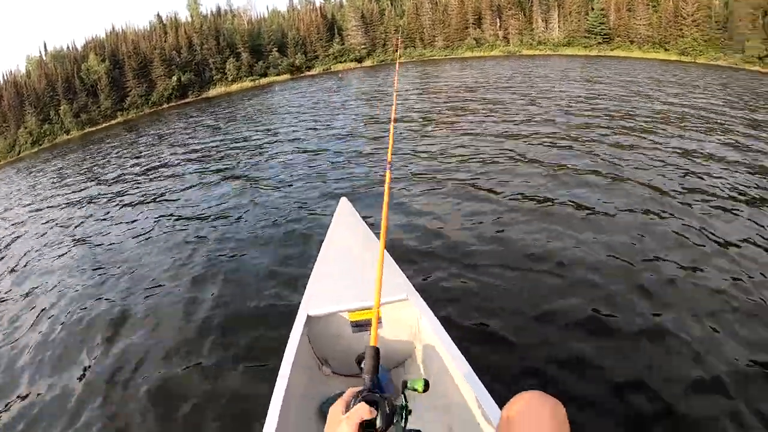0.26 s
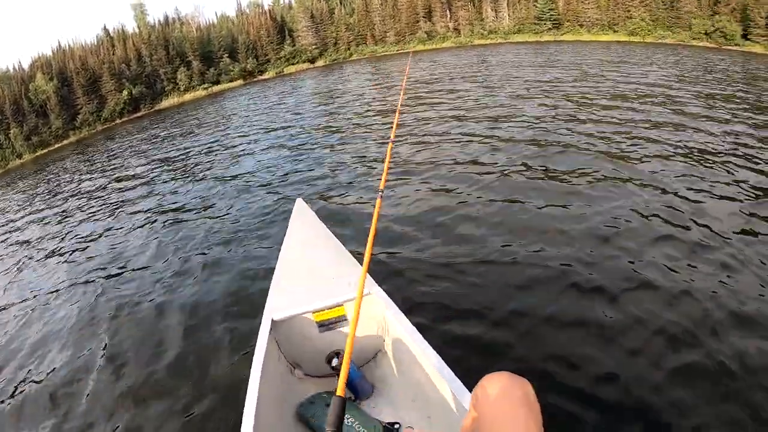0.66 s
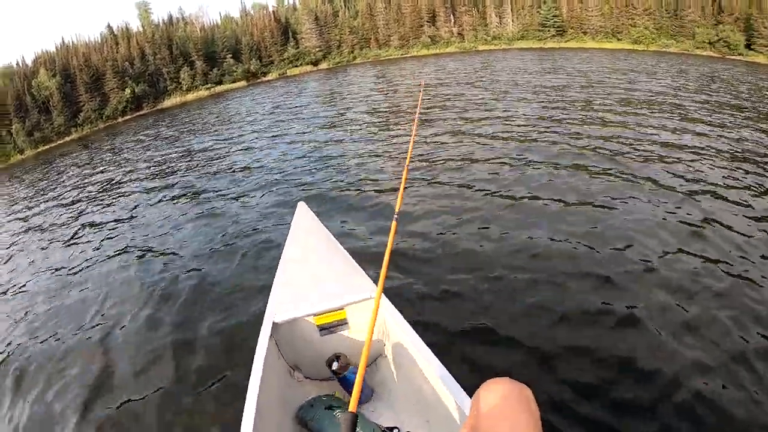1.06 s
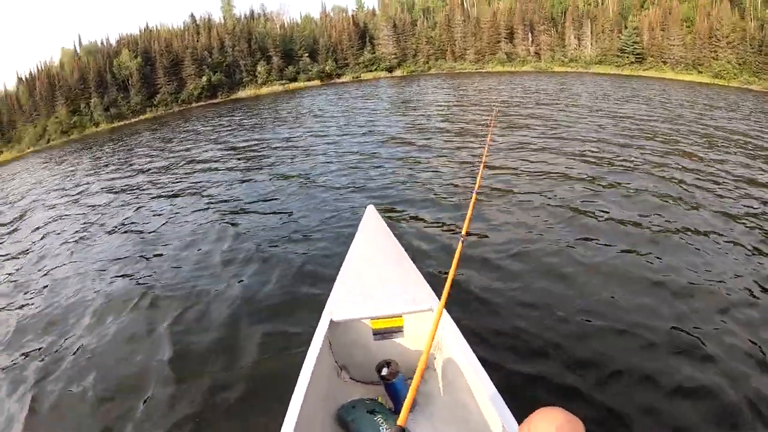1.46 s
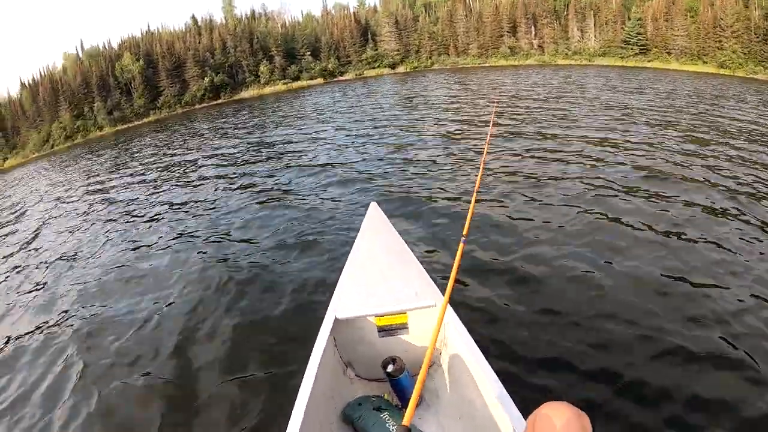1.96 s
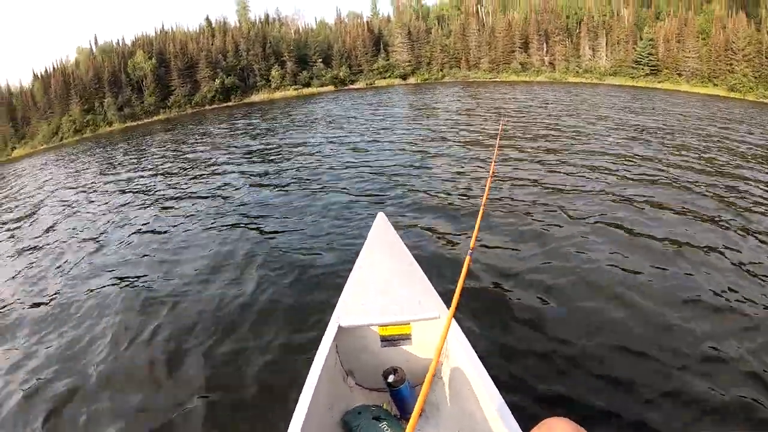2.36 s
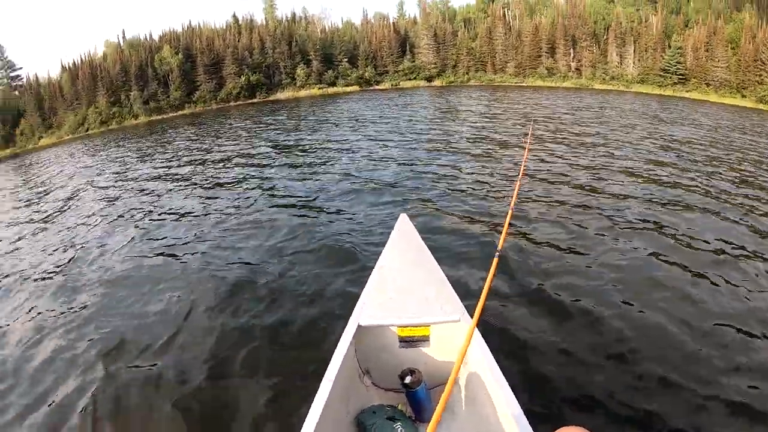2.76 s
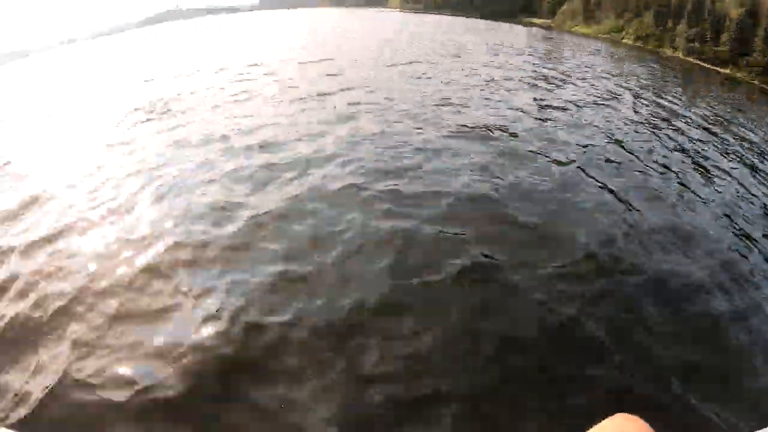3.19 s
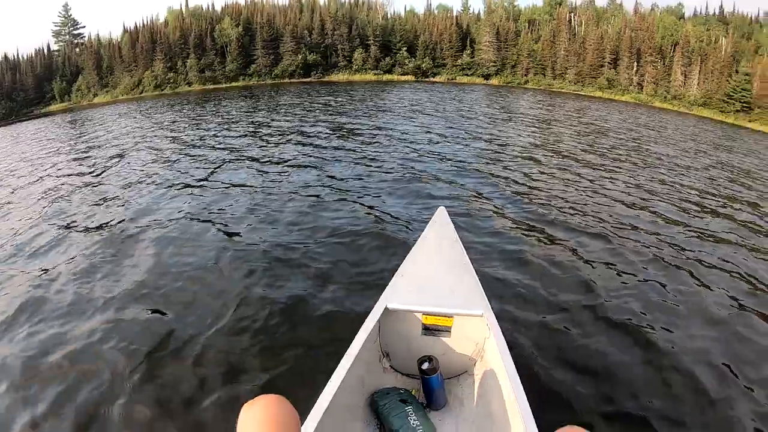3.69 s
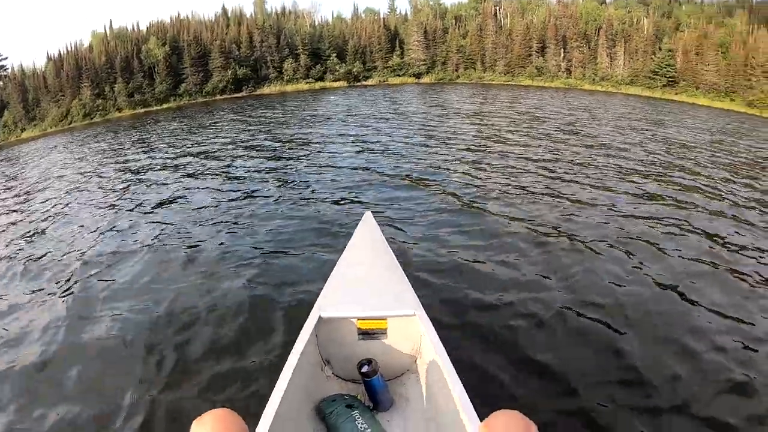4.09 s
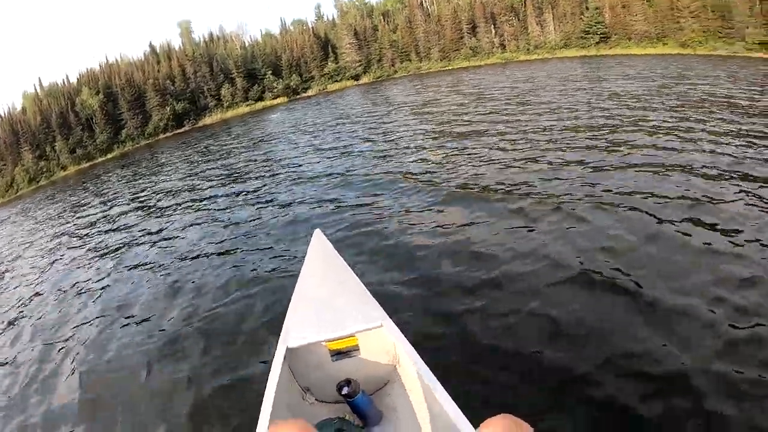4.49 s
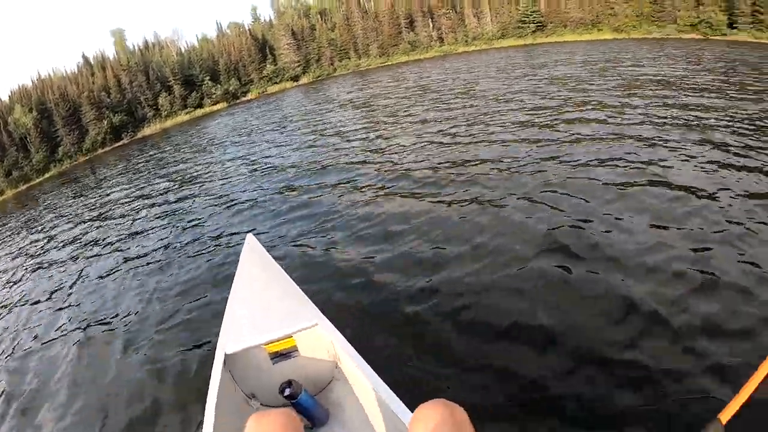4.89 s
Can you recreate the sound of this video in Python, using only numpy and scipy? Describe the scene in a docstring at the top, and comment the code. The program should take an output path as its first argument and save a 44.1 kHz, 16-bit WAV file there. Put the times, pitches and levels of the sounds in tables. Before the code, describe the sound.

Low wind rumbles and thumps on a head-worn microphone throughout, while small waves fizz softly along a canoe, with tiny bubbles popping in the first half. At about 0.8 seconds a fishing reel's latch snaps sharply, the loudest click. A faint bird whistles two falling notes at 1.5 seconds, followed by a small tick. From 2.6 to 3.1 seconds come light clicks and knocks, a soft falling gurgle and rubbing clothes. The wind swells strongly just after 3 seconds, and a hollow knock sounds on the hull at 3.5. From about 4 seconds the reel is wound on the right, a soft whirring hiss with short bursts of gear ticking near 4.4, 4.7 and 4.9 seconds, over rustling cloth and more gusts. The bird repeats faintly at 4.8 seconds, and two light knocks come at 5.1.

```python
"""Fishing from a canoe

Wind thumps on a small stereo microphone on an angler's head. Little waves fizz and bubble along
the hull. The reel latch snaps, clothes rub as the angler twists, and the crank is wound:
the spool whirrs and the gear teeth tick. A bird whistles two falling notes from the shore, twice."""
import sys
import numpy as np
from scipy import signal
from scipy.fft import rfft, irfft
from scipy.io import wavfile
from scipy.ndimage import uniform_filter1d

SR = 44100
rng = np.random.default_rng(int(sys.argv[2]) if len(sys.argv) > 2 else 0)


def wav_record(signal):
    """Record a signal, one row per channel, as 16-bit PCM in the file named by sys.argv[1]."""
    frames = np.transpose(np.atleast_2d(signal))
    bounded = np.clip(frames, -1, 1)
    # unit amplitude maps onto the largest positive 16-bit level
    quanta = np.round(bounded * 32767).astype(np.int16)
    wavfile.write(sys.argv[1], SR, quanta)


N = 226798

# Gusts; pan is always left minus right: peak t/s, level/dB, rise/s, fall/s, pan/dB, small eddies/dB
GUSTS = [(0.0, -28.5, .1, 0.15, -2, 2), (.35, -37.5, 0.19, 0.11, -9.5, 1.5),
         (.62, -36.5, 0.25, 0.11, 16, 2), (.95, -34, 0.063, 0.042, 13.5, -1.5),
         (1.36, -34, 0.032, 0.029, 23, 1), (1.65, -47, 0.42, 0.21, 9, -23),
         (1.97, -39, 0.087, 0.046, 20, -3.5), (2.35, -30.5, 0.1, 0.14, 2.5, -2.5),
         (2.8, -47, 0.63, 0.1, 12, -19), (3.14, -25, 0.041, 0.11, 5, 3),
         (3.299, -24.5, 0.11, 0.034, -5.5, 1), (3.78, -38, 0.19, 0.2, -18, 1),
         (3.991, -29, 0.056, 0.055, -8.5, 6), (4.35, -35.5, 0.051, 0.049, -18, 2.5),
         (4.549, -26, 0.046, 0.091, -10.5, -3.5), (4.97, -29, 0.24, 0.2, 3, -5)]
# Tone of the wind: f/Hz, relative level/dB
WIND_COLOUR = [(15, -7), (36, 11), (53, 0), (113, -15), (231, -44.5), (261, -66), (420, -48), (550, -59),
               (920, -120)]
# Higher rumble of the gusts: t/s, level/dB
RUMBLE = [(0, -62), (1.0, -67), (2.95, -67), (3.13, -48), (3.3, -54.5), (4.04, -60), (4.1, -45), (4.6, -54),
          (5.14, -52)]

# Loudness of the little waves: t/s, level/dB
LAPPING = [(0, -59.5), (.3, -60), (.73, -63), (1.3, -61.5), (1.94, -60), (2.55, -58.5), (3.6, -64),
           (4.05, -66.5), (5.14, -58)]
# Tone of the water: f/Hz, relative level/dB
WATER_COLOUR = [(180, -41), (300, -32), (331, -7.5), (622, -6.5), (711, 3.5), (1040, -7), (1150, -1.5),
                (1950, -2.5), (3270, -3.5), (3860, -6.5), (6560, -14), (9290, -13), (11500, -36.5),
                (15800, -44)]
# How alike the water sounds on both sides: f/Hz, likeness from 0 to 1
WATER_LIKENESS = [(300, 0.26), (1000, 0.25), (3000, 0.84), (8000, 0.66), (14000, 0.2)]
# How far the water's sound on the left runs ahead: f/Hz, phase/rad
WATER_LEFT_LEAD = [(0, 16), (860, -2.5), (2330, 1.2), (4740, 1.07), (7150, 3), (11500, 2), (16000, -7)]
# Brief dips in the water and cloth sounds: t/s, gain/dB, half width/s
DIPS = [(.1, -5.5, 0.056), (3.67, -6.5, 0.064), (4.0, -11.5, 0.078)]
# Nearby bubbles and drips: t/s, level/dB, f/Hz
BUBBLES = [(0.0698, -38.5, 2860), (0.178, -39.5, 2630), (0.2163, -45, 2280), (0.2678, -39.5, 2870),
           (0.342, -41, 1920), (0.531, -40, 1780), (0.576, -44.5, 3300), (0.6156, -44.5, 2660),
           (0.671, -42, 3200), (0.6905, -41, 2500), (0.822, -42, 1890), (1.226, -41, 2070),
           (1.2732, -43.5, 1880), (1.609, -41, 3190), (1.8313, -42, 3700), (1.848, -38.5, 1760),
           (1.961, -39.5, 2510), (2.2576, -42, 3220), (2.43, -42, 4520)]
# Water in a closing hollow: t/s, f/Hz, level/dB
GURGLE = [(2.755, 950, -58), (2.789, 704, -52), (2.83, 540, -47), (2.97, 375, -49.5), (3.1, 290, -57)]
# Droplets hitting the hull: t/s, relative level/dB
SPRAY = [(0.7172, -45), (1.832, -46.5), (2.1824, -53), (2.3475, -49), (2.358, -50), (2.375, -44.5),
         (2.5656, -46), (3.4084, -38)]
# Tone of the droplets: f/Hz, gain/dB
SPRAY_COLOUR = [(2500, -24), (4500, 16), (6500, -14), (9200, 11), (11500, -9.5), (14500, -21)]

# Short hollow knocks: against the hull, and the low thud of the reel latch:
# t/s, level/dB, f/Hz, pan/dB, time to fade 60 dB/s
KNOCKS = [(0.065, -40, 252, 0, 0.038), (.771, -29, 532, 1, .012), (1.6818, -34, 2470, 10.5, 0.011),
          (2.681, -39.5, 960, 26, 0.0056), (2.694, -40, 1270, 22, 0.023), (2.772, -35, 940, 24, 0.0071),
          (2.794, -36, 756, 26, 0.0065), (2.813, -35.5, 512, 3, 0.039), (2.876, -38, 1020, 19, 0.013),
          (2.945, -38, 890, 26, 0.019), (2.999, -35.5, 347, -4, 0.045), (2.7061, -28.5, 250, -2, 0.0047),
          (3.524, -16, 560, -4.5, 0.0087), (3.53, -30, 189, 0.5, 0.057), (5.095, -30.5, 580, -7, 0.011),
          (5.123, -32, 565, -5, 0.0095)]
# Snaps of reel parts: t/s, level/dB, brightness/(dB per octave), pan/dB, chatter length/s
SNAPS = [(0.394, -39, -2, 4, 0.0012), (0.45, -40.5, -15, -8, 0.002), (0.457, -37, 6, -4, 0.0023),
         (0.7453, -26, 6, -4, 0.0025), (.769, -20, -16.5, -12.5, 0.0017), (0.7725, -5.5, 14, -3, 0.0019),
         (0.7842, -19, -11, -13, 0.0014), (0.787, -35.5, -14, -8, 0.012), (1.68, -36.5, -4, 6, 0.0069),
         (2.581, -32.5, 6, 5, 0.0027), (2.596, -37, 18, -4, 0.0036), (2.638, -36, 2, 5, 0.0092),
         (2.7062, -21, -7, 2, 0.00094), (2.751, -30.5, -2, 0, 0.0081), (3.39, -29.5, -12, -9, 0.0014),
         (4.354, -30, -3, 4, 0.0032)]
# Ringing tones of the reel body: f/Hz, relative level/dB, time to fade 60 dB/s
REEL_MODES = [(760, -20, 0.0083), (1460, 5, 0.0064), (1880, 9.5, 0.011), (2830, -7, 0.013),
              (3460, 23.5, 0.0026), (4600, 1, 0.0024), (5170, 9, 0.0042), (6450, 1, 0.0076),
              (6920, -5, 0.0055), (8350, -13.5, 0.011), (10500, -40, 0.0033)]
# Resonances of the gear housing: f/Hz, width/Hz, gain/dB
HOUSING_MODES = [(1542, 520, -5.5), (2246, 660, -9), (3960, 2470, -27.5), (8600, 1250, -21)]
# Pushes on the crank, each speeding up and slowing down:
# t/s, length/s, fastest after/s, top tooth rate/Hz, bend of that rate/(Hz per s squared), level/dB
CRANK_PUSHES = [(3.72, .06, .028, 410, 32000, -50), (4.385, .1, .022, 420, 29000, -37.5),
                (4.655, .07, .029, 426, 55000, -37), (4.89, .085, .04, 410, 80000, -38)]

# Rubs of cloth and gear: peak t/s, rise/s, fall/s, dull level/dB, middle over dull/dB, bright over dull/dB
RUBS = [(2.598, 0.014, 0.017, -73, 38, 35.5), (2.701, 0.032, 0.035, -48, 11.5, -4.5),
        (2.773, 0.048, 0.073, -44.5, 5, -3.5), (2.886, 0.02, 0.013, -45, 12, -5),
        (2.934, 0.046, 0.12, -42, 7, -9.5), (3.12, 0.14, 0.32, -60, -6, 3.5),
        (3.4, 0.031, 0.21, -57.5, 13.5, -4), (3.514, 0.1, 0.036, -43.5, 1, -11.5),
        (3.535, 0.023, 0.024, -36, -14.5, -17.5), (3.63, 0.075, 0.04, -54.5, -6, -4),
        (3.738, 0.051, 0.069, -65.5, 11.5, 5), (3.845, 0.13, 0.055, -54.5, -8, -16),
        (4.101, 0.23, 0.58, -63, -8, 5.5), (4.3, 0.095, 0.46, -43, 0.5, -12),
        (4.45, 0.24, 0.36, -47, -7, -26), (4.7, 0.37, 0.051, -56, 14, -13.5),
        (5.1, 0.42, 0.19, -49.5, -6, -16)]
# Tone of the cloth: f/Hz, relative level/dB
CLOTH_COLOUR = [(120, -17), (200, -21), (316, 1), (588, 4), (788, 0.5), (912, 0.5), (1490, -11),
                (2320, -16), (6570, -34), (9820, -34), (11500, -58), (15000, -57), (15800, -70)]
# Side of the rustle as the head swings: t/s, strongest pan/dB
RUSTLE_PAN = [(2.5, -1), (2.7, 3), (3.15, 5.5), (3.35, -11.5), (3.75, -22), (4.3, -6.5), (5.14, -17)]
# A tightening line or strap: t/s, f/Hz, relative level/dB
SQUEAK = [(4.24, 600, -58), (4.255, 640, -50), (4.27, 820, -54), (4.335, 900, -50), (4.35, 920, -60)]

# The bird's two notes, a list of points for each: t/s into the call, f/Hz, level/dB
BIRD_NOTES = [
    [(0, 4800, -65), (.027, 4375, -59.5), (.07, 4265, -56), (.087, 4000, -66)],
    [(.092, 3350, -48), (.112, 3120, -44.5), (.137, 2950, -56)],
]
# When the bird calls: t/s, gain/dB
BIRD_CALLS = [(1.52, -0.5), (4.779, -2)]
# Peeps of a farther bird: t/s, length/s, f/Hz, level/dB
FAR_PEEPS = [(4.635, .03, 3900, -62), (4.713, 0.015, 3930, -59)]


def wind():
    """Eddies, small swirls of air, push on each side of the microphone; gusts add a higher rumble."""
    eddies = rng.standard_normal((2, N)) * evened(amp(lumps((2, N), (1, 800), depth_db=5)))
    hz, t, spectrum = to_spectrum(eddies, 2048)
    colour_db = read(WIND_COLOUR, hz)
    low_db = colour_db - band_db(colour_db, hz, 20, 120) + 3
    patches_db = lumps(spectrum.shape, (1, 2, 6), depth_db=3) - 2  # each eddy has its own pitch
    sides_db, small_db = gusts_db(t)
    shed_db = 0.52 * (sides_db.mean(0) + 41.5) + small_db  # strong gusts shed smaller eddies
    lift_db = np.outer(read([(45, 0), (100, 0.99)], hz), shed_db)
    buffets = to_sound(spectrum * amp(low_db[:, None] + patches_db + lift_db), 2048)
    rumble_band = np.exp(-(np.log((hz + 1) / 170) / 0.58) ** 2)  # a hump around 170 Hz
    blended = amp(-3) * (spectrum + 0.44 * spectrum[::-1])  # much alike on both sides
    rumble = evened(to_sound(blended * rumble_band[:, None], 2048))
    s = np.arange(N) / SR
    return buffets * amp([np.interp(s, t, db) for db in sides_db]) + rumble * amp(along(RUMBLE, s)[0])


def gusts_db(t):
    """Gusts swell over a steady breeze: the level on each side, and the gain of the small eddies."""
    breeze = (0, -48.5, np.inf, np.inf, 8.5, -36)  # a gust that never fades
    s, db, rise, fall, pan_db, small_db = np.array(GUSTS + [breeze]).T
    each_db = db[:, None] + swells(np.transpose([s, rise, fall]), t)
    sides_db = np.array([summed_db(each_db + side * pan_db[:, None]) for side in (.5, -.5)])
    return sides_db, summed_db(each_db + small_db[:, None]) - summed_db(each_db)


def snaps():
    """Parts chatter for a moment and make the reel body ring."""
    out, t = np.zeros((2, N)), np.arange(2500) / SR
    band = signal.butter(2, [700, 8300], "band", fs=SR)  # small parts give no bass; the hand dulls them
    for s, peak_db, tilt_db, pan_db, length in SNAPS:
        age = t / length
        chatter = rng.standard_normal(len(t)) * (age * np.exp(-age ** 2) + amp(-17.5) * np.exp(-t / .0085))
        grip = rng.uniform(.97, 1.03)  # the hand shifts the pitch a little
        ring = sum(amp(db + tilt_db * np.log2(hz / 3000) - 60 * t / fade_s)
                   * np.sin(2 * np.pi * hz * grip * t) for hz, db, fade_s in REEL_MODES)
        snap = signal.lfilter(*band, signal.oaconvolve(chatter, ring)[:len(t)])
        add(out, s, amp(peak_db) * placed(snap / abs(snap).max(), pan_db, lag=-1.2))
    return out


def reel():
    """The reel is wound on the right, so the left side hears it softer and later."""
    return placed(spool_whirr() + gear_teeth(), pan_db=-16.5, lag=17.6)


def spool_whirr(start_s=4.055, spin_up_s=0.087, line_eases_s=4.74):
    """Spool and line hiss in the housing, sagging just after each push on the crank."""
    t = np.arange(N) / SR
    treble_db = -9.5 * (1 + np.tanh((t - line_eases_s) / .03)) / 2  # duller as the line slackens
    friction = rng.standard_normal(N) * amp(lumps((N,), (60,), depth_db=1.5))
    hiss = evened(housing(friction, treble_db))
    sag_db = dips_db([(s + length + .018, -10, .04) for s, length, *_ in CRANK_PUSHES], t)
    level_db = -46 - 19.5 * np.exp(-abs(t - start_s) / spin_up_s) + sag_db
    return hiss * amp(level_db) * (t > start_s)


def gear_teeth():
    """Teeth tick evenly when pushed hard and rattle loosely when pushed lightly."""
    out = np.zeros((1, N))
    for s, length, fastest_s, top_hz, bend, top_db in CRANK_PUSHES:
        t = np.arange(0, length, 1 / SR)
        hz = top_hz - bend * (t - fastest_s) ** 2
        level_db = top_db - 9.5 * (2 * t / length - 1) ** 2
        loose = np.clip((-35.5 - level_db) / 20, 0, 1)
        wobble = amp(lumps(t.shape, (100,), depth_db=.05))
        phase = 2 * np.pi * np.cumsum(uniform_filter1d(hz, 300) * wobble) / SR
        ticks = sum(np.cos(k * phase) / k for k in range(1, 7))
        scrape = rng.standard_normal(len(t)) * (1 + np.cos(phase))
        teeth = (1 - loose) * evened(housing(ticks)) + loose * evened(housing(scrape))
        add(out, s, teeth[None] * amp(level_db) * signal.windows.tukey(len(t), .2))
    return out[0]


def housing(x, treble_db=0):
    """The reel's hollow case rings at a few pitches; treble_db turns the highest up or down."""
    rings = [(-1) ** k * amp(db) * resonate(x, hz, width) for k, (hz, width, db) in enumerate(HOUSING_MODES)]
    return sum(rings[:-1]) + amp(treble_db) * rings[-1]


def rustle(head_turn_s=3.3):
    """Rubbing cloth makes grainy noise whose dull, middle and bright parts swell separately."""
    grain = amp(lumps((N,), (250,), depth_db=2))
    near, other = rng.standard_normal((2, N)) * evened(grain)
    turned = np.arange(N) / SR > head_turn_s
    left = np.where(turned, np.roll(near, 12), np.roll(near, -3))  # early at first, late after the turn
    hz, t, spectrum = to_spectrum(np.array([left, 0.62 * (near + other)]), 256)
    dull_db, middle_db, bright_db = rubs_db(t)
    colour_db = read(CLOTH_COLOUR, hz)
    # level/dB, lowest f/Hz, highest f/Hz, points of (f/Hz, share)
    parts = [(dull_db, 300, 1100, [(800, 1), (1800, 0)]),
             (middle_db, 1100, 4000, [(800, 0), (1800, 1), (2800, 1), (6000, 0)]),
             (bright_db, 4000, 12000, [(2800, 0), (6000, 1)])]
    level_db = sum(np.outer(read(share, hz), db - band_db(colour_db, hz, lo, hi))
                   for db, lo, hi, share in parts)
    level_db += colour_db[:, None] + lumps(spectrum[0].shape, (3, 8), depth_db=2.5)
    shadow = read([(350, 0), (900, 0.9), (2500, 0.98), (5000, 0.56)], hz)  # the head blocks no bass
    pan_db = np.outer(shadow, along(RUSTLE_PAN, t)[0])
    return to_sound(spectrum * amp(level_db) * amp([pan_db / 2, -pan_db / 2]), 256)


def rubs_db(t):
    """Levels of the dull, middle and bright parts of all rubs together."""
    rows = np.array(RUBS)
    each_db = rows[:, 3:4] + swells(rows[:, :3], t)
    return [summed_db(each_db + over_db) + dips_db(DIPS, t) for over_db in (0, rows[:, 4:5], rows[:, 5:6])]


def knocks():
    """Knocks on the hull and the thud of the reel latch: a few swings that quickly stop."""
    out, t = np.zeros((2, N)), np.arange(3000) / SR
    for s, peak_db, hz, pan_db, fade_s in KNOCKS:
        ring = np.sin(2 * np.pi * hz * t) * amp(-60 * (t / fade_s) ** 2) * (1 - np.exp(-t / 0.00058))
        add(out, s, amp(peak_db) * placed(ring / abs(ring).max(), pan_db))
    return out


def lapping():
    """Little waves make a fine fizz and a swarm of tiny bubbles."""
    swarm = np.zeros(N)
    per_second = 28 * amp(lumps((N,), (1500,), depth_db=5))  # bubbles come in clumps, one for each wave
    for hz in np.geomspace(900, 5200, 16):
        sizes = amp(3.2 * np.minimum(rng.exponential(1, N), 4))
        births = rng.random(N) < per_second / SR
        swarm += signal.oaconvolve(sizes * births, blip(hz, cycles=4.95, rise=0.057))[:N] * np.sqrt(hz)
    water = rng.standard_normal((2, N)) * amp(lumps((N,), (200,), depth_db=2.5))  # the fizz
    water[0] += amp(-5.5) * evened(swarm)
    hz, t, (main, other) = to_spectrum(water, 512)
    alike = read(WATER_LIKENESS, hz)[:, None]
    left = main * np.exp(1j * read(WATER_LEFT_LEAD, hz))[:, None]
    right = alike * main + np.sqrt(1 - alike ** 2) * other
    colour_db = read(WATER_COLOUR, hz)
    colour_db -= band_db(colour_db, hz, 1000, 5000)
    level_db = along(LAPPING, t)[0] + dips_db(DIPS, t) + lumps(main.shape, (8, 12), depth_db=1)
    return to_sound(np.array([left, right]) * amp(colour_db[:, None] + level_db), 512)


def bubbles():
    """Bubbles close enough to stand out, each with a soft pop."""
    out, t = np.zeros((2, N)), np.arange(400) / SR
    for s, level_db, hz in BUBBLES:
        puff = rng.standard_normal(len(t)) * t * np.exp(-t / 0.0023)
        pop = amp(-17.5) * evened(resonate(puff, hz=2500, width_hz=1800))
        add(out, s, amp(level_db) * placed(blip(hz, cycles=5.6, rise=0.077), pan_db=7.5))
        add(out, s, amp(level_db) * placed(pop, pan_db=-1))
    return signal.sosfilt(signal.butter(4, 7000, fs=SR, output="sos"), out)  # the canoe's rim blocks treble


def blip(hz, cycles, rise):
    """One bubble: a fading tone whose pitch climbs as it nears the surface."""
    turns = np.arange(round(7 * cycles * SR / hz)) * hz / SR
    swell = 1 - np.exp(-turns ** 2)
    climb = 1 + rise * np.minimum(turns / cycles, 2)
    return np.sin(2 * np.pi * turns * climb) * np.exp(-turns / cycles) * swell


def gurgle():
    """Water churns in a closing hollow, and the pitch slides down."""
    out, t = np.zeros((2, N)), np.arange(GURGLE[0][0], GURGLE[-1][0], 1 / SR)
    hz, level_db = along(GURGLE, t)
    churn = rng.standard_normal(len(t)) * amp(lumps(t.shape, (200,), depth_db=2))
    hollow = evened(resonate(churn, hz, width_hz=135))
    add(out, t[0], placed(hollow * amp(level_db) * signal.windows.tukey(len(t), .1), pan_db=0.5))
    return out


def spray(tick_s=0.0006, tail_s=0.023):
    """Each droplet hits the hull with a tick and a short hiss."""
    out, t = np.zeros((2, N)), np.arange(2048) / SR
    shape = t / tick_s * np.exp(-t / tick_s) + amp(-17) * np.exp(-t / tail_s)
    for s, level_db in SPRAY:
        burst = rng.standard_normal((2, len(t))) * shape
        add(out, s, amp(level_db) * (burst + 0.24 * burst[::-1]))
    return irfft(rfft(out) * amp(read(SPRAY_COLOUR, np.fft.rfftfreq(N, 1 / SR))), N)


def squeak():
    """A line or strap catches and slips as it tightens: one short rising squeak."""
    out = np.zeros((2, N))
    s, sound = whistle(SQUEAK, octave_db=-28, pan_db=-24)
    add(out, s, sound * amp(lumps(sound[0].shape, (120,), depth_db=4) - 2))
    return out


def birds(echo_s=0.074, echo_db=-8):
    """One bird sings the same song twice, a farther one peeps, and the trees echo both."""
    out = np.zeros((2, N))
    for start, db in BIRD_CALLS:
        for note in BIRD_NOTES:
            s, sound = whistle(note, octave_db=-26, pan_db=5)
            add(out, start + s, amp(db) * sound)
    for s, length, hz, db in FAR_PEEPS:
        add(out, *whistle([(s, hz, db), (s + length, hz, db)], octave_db=-36, pan_db=-10))
    trees = rng.standard_normal((2, 6000)) * np.exp(-np.arange(6000) / SR / echo_s)
    echo = signal.oaconvolve(out, trees / np.linalg.norm(trees[0]), axes=1)[:, :N]
    return out + amp(echo_db) * echo


def whistle(rows, octave_db, pan_db):
    """A gliding tone with a faint octave above it; returns its start time and its sound."""
    t = np.arange(rows[0][0], rows[-1][0], 1 / SR)
    hz, level_db = along(rows, t)
    phase = 2 * np.pi * np.cumsum(hz) / SR
    note = np.sqrt(2) * (np.sin(phase) + amp(octave_db) * np.sin(2 * phase)) * amp(level_db)
    return t[0], placed(note * signal.windows.tukey(len(t), .2), pan_db)


def amp(db):
    """Turns decibels into a gain."""
    return 10 ** (np.asarray(db) / 20)


def evened(x):
    """Scales a signal to an average power of 1."""
    return x / np.sqrt(np.mean(abs(x) ** 2) + 1e-20)


def read(points, hz):
    """Looks up a table at the frequencies hz."""
    f, value = np.transpose(points)
    return np.interp(np.log(hz + 1), np.log(f + 1), value)


def along(rows, t):
    """Looks up each column of a table at the times t."""
    s, *columns = np.transpose(rows)
    return [np.interp(t, s, c) for c in columns]


def placed(x, pan_db, lag=0):
    """Makes a sound stereo; the left side hears it lag samples late."""
    return np.array([np.roll(x, lag) * amp(pan_db / 2), x * amp(-pan_db / 2)])


def add(mix, s, sound):
    """Mixes a sound in at s seconds."""
    part = mix[:, round(s * SR):][:, :sound.shape[1]]
    part += sound[:, :part.shape[1]]


def to_spectrum(x, size):
    """Splits a sound into slices of size samples: frequencies, times and spectrum."""
    return signal.stft(x, SR, nperseg=size, noverlap=size * 3 // 4)


def to_sound(spectrum, size):
    """Joins the slices back into a sound."""
    return signal.istft(spectrum, SR, nperseg=size, noverlap=size * 3 // 4)[1][:, :N]


def band_db(colour_db, hz, lo, hi):
    """Level that white noise of power 1 keeps between lo and hi Hz once coloured."""
    return 10 * np.log10(np.sum(amp(colour_db[(hz >= lo) & (hz < hi)]) ** 2) / len(hz))


def lumps(shape, size, depth_db):
    """Smooth random ups and downs in dB, about size steps wide."""
    x = rng.standard_normal(shape)
    for axis, n in enumerate(size):
        x = uniform_filter1d(uniform_filter1d(x, n, axis), n, axis)
    return depth_db * 2 * np.tanh(evened(x) / 2)  # tanh tames the extremes


def resonate(x, hz, width_hz):
    """Keeps the sound near a steady or gliding pitch, filtering twice for steep sides."""
    spin = np.exp(2j * np.pi * np.cumsum(hz * np.ones(len(x))) / SR)
    decay = np.exp(-np.pi * width_hz / SR)
    for _ in range(2):
        x = 2 * (spin * signal.lfilter([1 - decay], [1, -decay], x / spin)).real
    return x


def swells(rows, t):
    """For rows of (peak t/s, rise/s, fall/s): 0 dB at the peak, -9 dB one rise or fall away."""
    top, rise, fall = np.transpose(rows)[:, :, None]
    return -9 * np.where(t < top, (top - t) / rise, (t - top) / fall)


def summed_db(db):
    """Level of all rows sounding together."""
    return 10 * np.log10(np.sum(amp(db) ** 2, 0) + 1e-20)


def dips_db(rows, t):
    """V-shaped drops in level, from rows of (t/s, gain/dB, half width/s)."""
    return sum(db * np.clip(1 - abs(t - s) / half, 0, 1) for s, db, half in rows)


def scene():
    """Everything that reaches the microphone."""
    return (wind() + lapping() + bubbles() + spray() + rustle() + snaps() + knocks() + gurgle()
            + reel() + squeak() + birds())


def record(dry):
    """Cuts the treble above 15800 Hz."""
    return signal.oaconvolve(dry, signal.firwin(511, 15800, window=("kaiser", 9), fs=SR)[None], "same")


dry = scene()
out = record(dry)
wav_record(out)
```